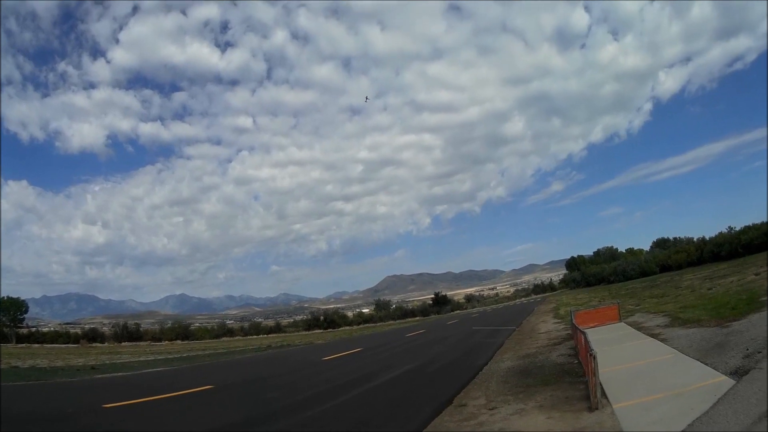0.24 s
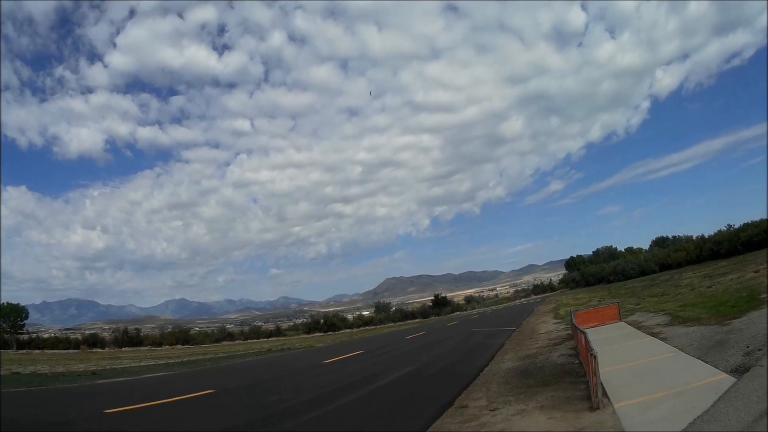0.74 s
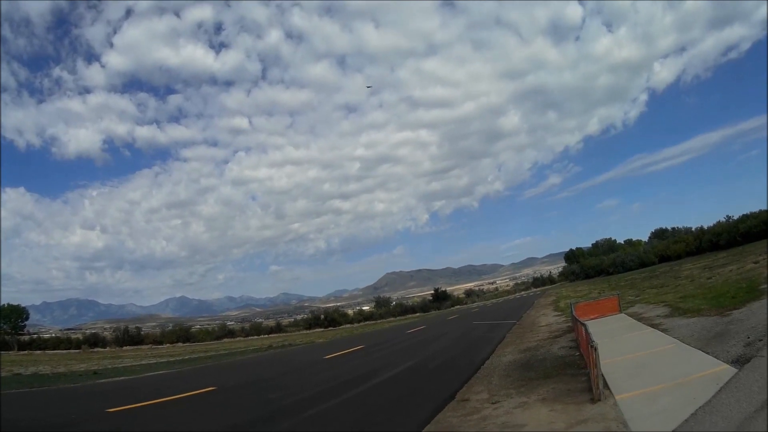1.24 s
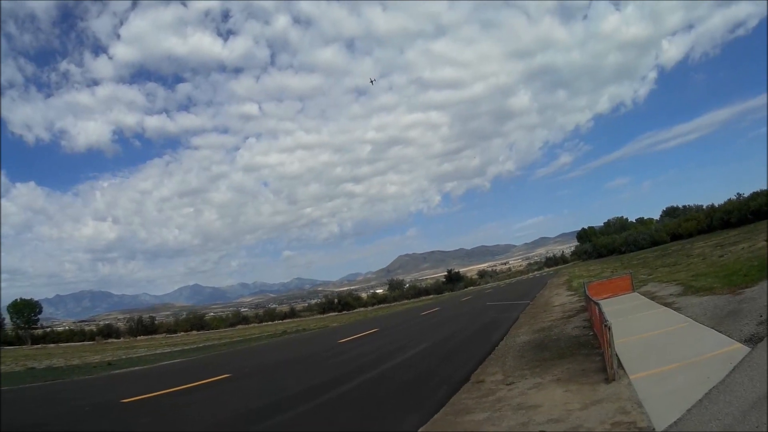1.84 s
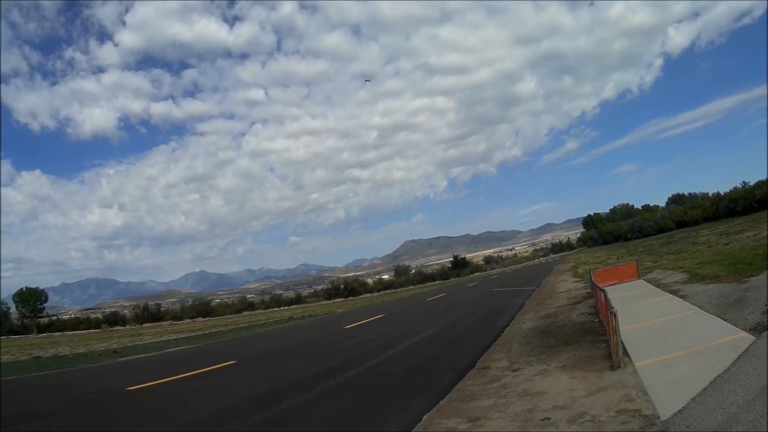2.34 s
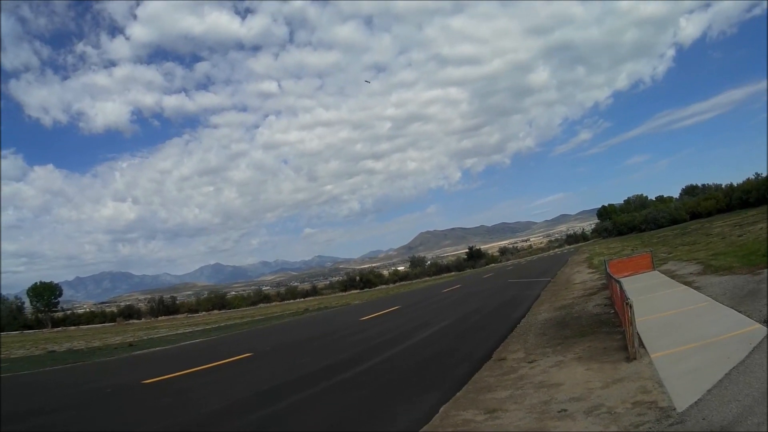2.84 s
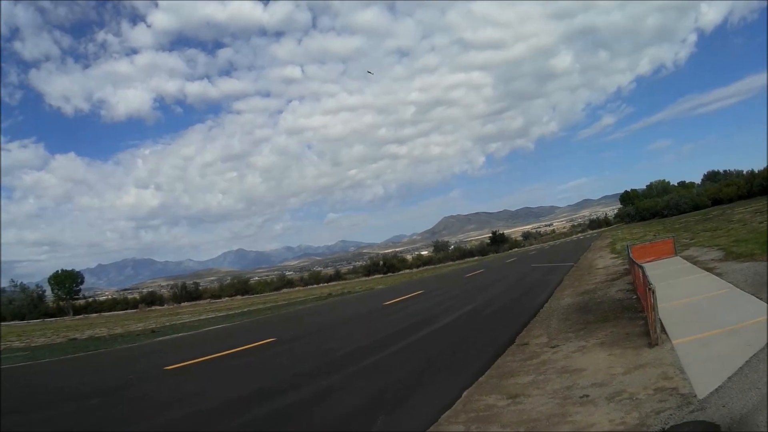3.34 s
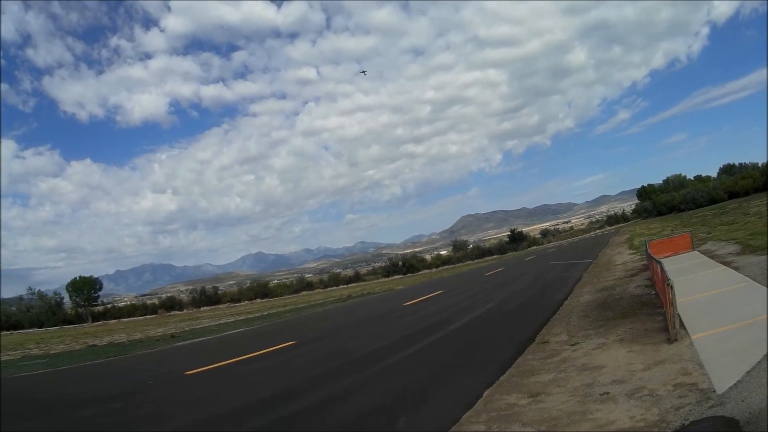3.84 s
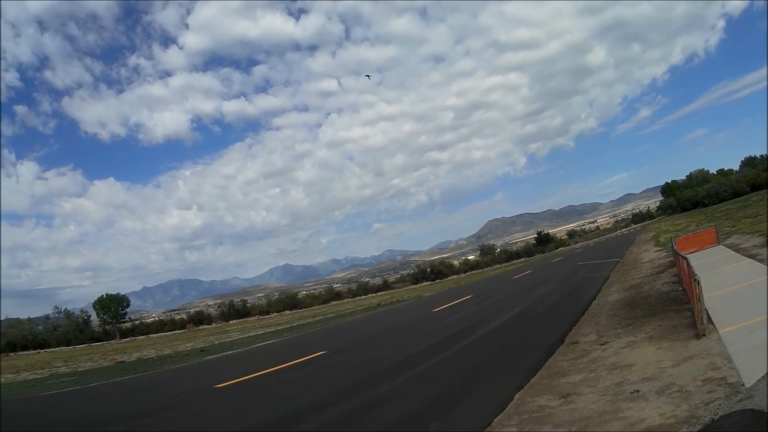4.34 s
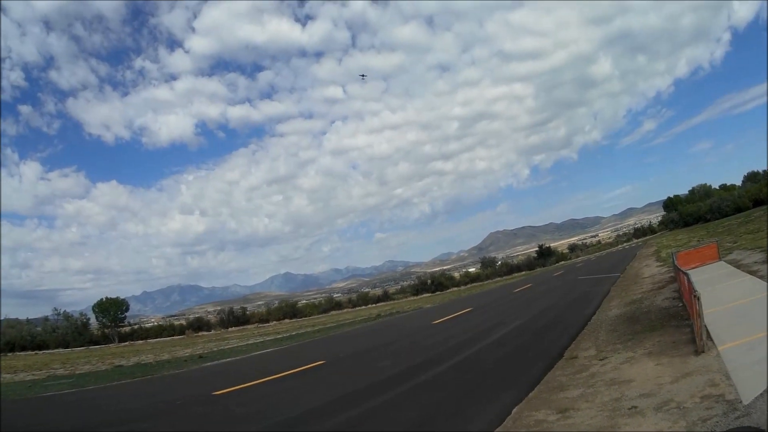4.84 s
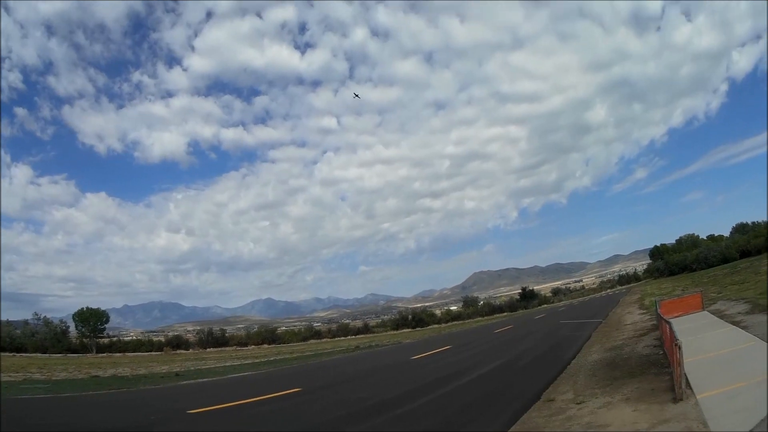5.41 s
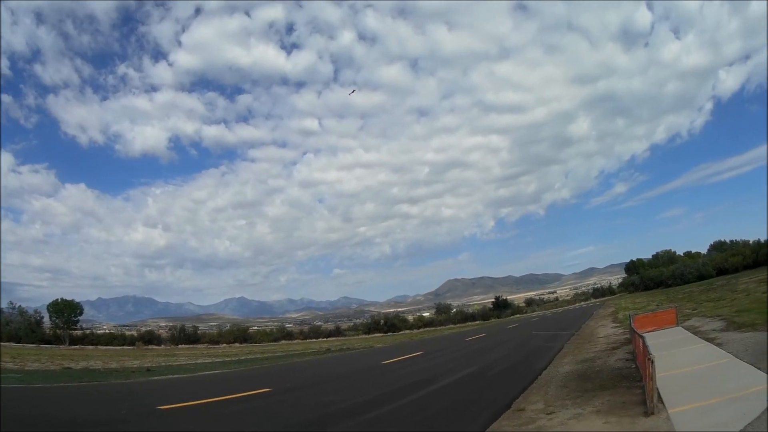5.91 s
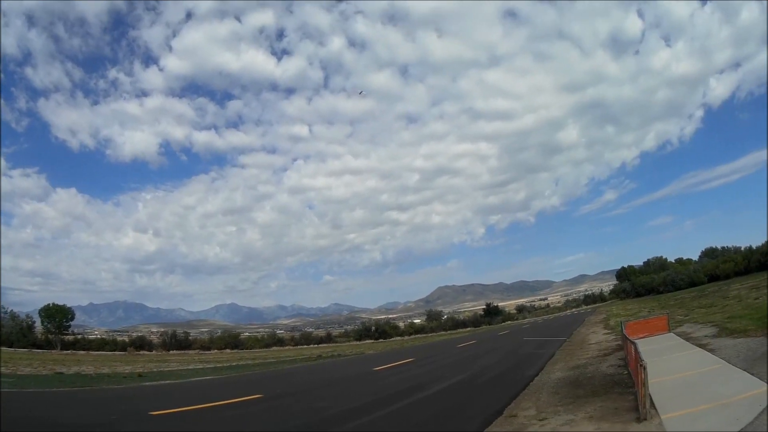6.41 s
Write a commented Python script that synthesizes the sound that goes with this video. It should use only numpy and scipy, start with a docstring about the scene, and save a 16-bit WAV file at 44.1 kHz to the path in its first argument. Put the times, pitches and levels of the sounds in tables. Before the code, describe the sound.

A petrol two-stroke on a large model aeroplane buzzes continuously over an open runway. It opens with a sharp rasp, thins into a hollow sliding honk, then crackles loudly in several swells. The pitch wavers slightly, sags after five seconds and quickly climbs back to a strong buzz. A small cased camera on the ground hears it with a close tarmac reflection, faint field scatter and soft hiss.

```python
"""A sharp rasping buzz comes first: the petrol two-stroke of a large model aeroplane, high over a runway.
Each turn of the crank fires one exhaust pop, and the propeller hums at twice that rate.
As the plane turns, the pops swing between a bright crack and a hollow, sliding honk.
At a small cased camera each pop arrives from the sky and again, some 4 ms later, off the tarmac.
The fields behind return a faint dull tail, over still air and hiss."""
import sys
import numpy as np
from scipy import signal
from scipy.fft import rfft, irfft, next_fast_len
from scipy.io import wavfile
from scipy.ndimage import uniform_filter1d, map_coordinates

SR = 44100
rng = np.random.default_rng(int(sys.argv[2]) if len(sys.argv) > 2 else 0)


def int16_out(signal):
    """Quantize to a 16-bit WAV file."""
    q = np.round(np.clip(np.atleast_2d(signal).T, -1, 1) * 32767)
    wavfile.write(sys.argv[1], SR, q.astype(np.int16))


N = 294147
TIME = np.arange(N) / SR   # s


# engine speed as heard on the ground: [t/s, firing rate f/Hz]
SPEED = [(0.0, 94.8), (0.05, 94.1), (0.5, 93.9), (0.6, 94.6), (0.8, 93.8), (1.0, 95.1), (1.05, 94.4),
         (1.1, 96.1), (1.2, 95.9), (1.25, 97.3), (1.76, 98.9), (2.16, 97.8), (2.36, 94.8), (2.51, 94.8),
         (2.76, 98.7), (3.06, 101.5), (3.16, 101.4), (3.21, 102.0), (3.26, 100.7), (3.31, 101.5),
         (3.46, 98.5), (3.56, 97.3), (3.91, 94.6), (4.36, 98.8), (4.46, 98.1), (4.51, 98.6), (4.71, 98.5),
         (4.81, 96.6), (4.96, 90.0), (5.02, 88.6), (5.22, 89.5), (5.32, 89.5), (5.37, 88.4), (5.57, 78.2),
         (5.62, 78.2), (5.72, 83.2), (5.77, 88.5), (5.92, 97.7), (6.02, 100.3), (6.12, 101.4),
         (6.22, 100.9), (6.37, 101.3), (6.57, 100.8), (6.67, 99.7)]
# spells of ragged or clean burning: [t/s, half-width/s, added roughness (0-1 scale)]
SPELLS = [(1.08, .2, .35), (5.9, .16, .25), (6.45, .22, -.2)]
INERTIA_S = 0.1   # the propeller's mass rounds off every change of speed
# burning is uneven (0-1), and more so as the throttle closes and the engine slows below its clean range
ROUGH_OPEN, CLEAN_ABOVE_HZ, ROUGH_PER_HZ = 0.5, 82, 0.028


def engine():
    """Crank turns so far, the running sum of the speed, and the roughness of the burning."""
    speed_hz = uniform_filter1d(in_time(SPEED)[0], int(INERTIA_S * SR), mode="nearest")
    rough = ROUGH_OPEN + ROUGH_PER_HZ * np.maximum(CLEAN_ABOVE_HZ - speed_hz, 0)
    for s, width_s, added in SPELLS:
        rough = rough + added * bell(s, width_s)
    turns = np.cumsum(speed_hz) / SR + 0.9   # the first pop comes a tenth of a turn in
    return turns, rough


# single hard firings of a rich charge: [t/s, pop level above the usual/dB]
BANGS = [(1.984, 5), (2.352, 4), (4.917, 6), (4.939, 5), (4.962, 5), (4.984, 4.5), (5.007, 3.5), (5.411, 6),
         (5.433, 5), (5.607, 6)]


def firings(turns, rough, jitter_s=0.00006, uneven_db=0.5, skip_db=0.5):
    """One impulse a turn, a little early or late, strong or weak, as the burning is rough."""
    count = np.arange(1, int(turns[-1]) + 1)
    when = np.interp(count, turns, TIME)
    unsteady = np.interp(when, TIME, rough)
    late, strong = rng.standard_normal((len(count), 2)).T
    at = np.clip((when + jitter_s * unsteady * late) * SR, 0, N - 2)
    # a badly scavenged cylinder fires strongly only every other turn
    every_other = (-1) ** count
    strength_db = unsteady * (uneven_db * strong + skip_db * unsteady * every_other)
    for s, extra_db in BANGS:
        strength_db[np.argmin(abs(when - s))] = extra_db
    strength = from_db(strength_db)
    # each impulse is shared between the two nearest samples
    sample, part = at.astype(int), at % 1
    pops = np.zeros(N)
    pops[sample] += strength * (1 - part)
    pops[sample + 1] += strength * part
    return pops


# one pop through silencer and camera case, shape only: [f/Hz, level/dB]
POP = [(300, -18), (390, -4.5), (480, 0.5), (700, 2.5), (900, 15), (1400, 17.5), (1850, 11.5), (2250, -8),
       (3100, -13.5), (4200, -21), (5200, -36.5), (6500, -46), (11000, -59)]
GAS_SHARE, GAS_DECAY_TURNS = 0.39, 0.11   # gas share is scaled by the roughness plus a half


def exhaust(turns, rough, gas_hz=2200):
    """Each pop is followed by a puff of turbulent gas, and both pass through the silencer."""
    pops = firings(turns, rough)
    puffs = rng.standard_normal(N) * np.exp(-(turns % 1) / GAS_DECAY_TURNS)
    puffs = signal.sosfilt(signal.butter(1, gas_hz, "high", fs=SR, output="sos"), puffs)
    gas = GAS_SHARE * (0.5 + rough) * rms_one(puffs)
    return colour(silencer(gas + rms_one(pops)), POP)


# the silencer's ringing modes: [f/Hz, width/Hz, lift level/dB]
RINGS = [(2638, 170, 10), (3620, 96, 8), (4660, 150, 7.5), (5640, 210, 20.5)]
RING_WANDER = 0.02   # the modes heard shift as the plane turns (spread, share of their pitch)


def silencer(x):
    """The higher modes ring on after each pop, at slowly wandering pitches."""
    for hz, width_hz, lift_db in RINGS:
        wandering_hz = hz * (1 + RING_WANDER * drift(3.06))
        x = x + (from_db(lift_db) - 1) * sliding(x, wandering_hz, width_hz)
    return x


# the camera case favours sound from below, bounce against direct: [f/Hz, level/dB]
BOUNCE = [(300, 7), (700, -1.5), (1100, 3), (1600, 6.5), (2800, 4.5), (4200, 2), (5600, -1.5), (9000, -1.5)]
# the lowest register, the drone: [t/s, level/dB]
DRONE = [(0.0, -38), (0.03, -30), (0.18, -29.5), (0.61, -39), (0.69, -34), (0.97, -47.5), (1.06, -37.5),
         (1.24, -39.5), (1.61, -35), (2.21, -35), (2.34, -29.5), (2.6, -29), (2.84, -34.5), (3.01, -46),
         (3.08, -37.5), (3.7, -30), (3.77, -34), (3.96, -35.5), (4.1, -42.5), (4.31, -34), (4.55, -36.5),
         (4.81, -30), (5.18, -39), (5.26, -37.5), (5.54, -42), (5.72, -37.5), (5.87, -25), (5.93, -27.5),
         (6.08, -26), (6.37, -35.5), (6.48, -32.5), (6.67, -38.5)]


def crack(pops, lobe_boost=1.0, rasp_boost=0.32, lobe_width_hz=230, rasp_width_hz=380):
    """The sharp, broad pops heard as the exhaust swings toward the ground, over its low drone."""
    gains, (lobe_hz, rasp_hz) = beam()
    lobe = sliding(pops, lobe_hz, lobe_width_hz)
    rasp = sliding(pops, rasp_hz, rasp_width_hz)
    pops = pops + lobe_boost * lobe + rasp_boost * rasp
    drone_gain = from_db(in_time(DRONE)[0])
    return beamed(with_bounce(pops, colour(pops, BOUNCE)), [drone_gain, *gains])


# the exhaust swings toward the ground and away: [t/s, half-width/s, level/dB, brightness/dB per octave,
# strongest pitch f/Hz, rasp pitch f/Hz, rasp lift level/dB]
SWINGS = [(0.03, 0.12, -28, -4.5, 1280, 3730, 11.5), (0.17, 0.13, -30.5, -11.5, 1260, 2720, 16.5),
          (0.35, 0.12, -40.5, 4, 1670, 3820, 8), (0.761, 0.23, -39.5, 2, 1560, 2480, 8),
          (1.499, 0.31, -38.5, 0, 723, 2620, 1.5), (2.08, 0.23, -32.5, 1.5, 1410, 4200, 1.5),
          (2.302, 0.054, -29, 2, 1890, 2600, 2), (2.41, 0.058, -26, -6, 1200, 4260, 5),
          (2.56, 0.082, -23.5, -1, 1280, 2730, 4), (2.68, 0.024, -37, 6, 1200, 3600, 4.5),
          (2.82, 0.1, -33, 1.5, 1130, 4620, -1), (3.081, 0.087, -32.5, 0.5, 1180, 3560, -11.5),
          (3.25, 0.079, -36, -2.5, 1370, 3470, 5.5), (3.42, 0.053, -40.5, 1.5, 1380, 4700, 9.5),
          (3.53, 0.063, -36, 0.5, 1930, 2780, 3), (3.73, 0.12, -24, -2.5, 1290, 3370, -5),
          (4.31, 0.04, -33.5, -5.5, 1390, 2700, -19), (4.66, 0.13, -37, 3, 1960, 2700, -2),
          (4.82, 0.072, -26.5, -6.5, 1280, 5160, 12), (5.0, 0.18, -34.5, -3, 1770, 2700, -6),
          (5.78, 0.067, -29, -2.5, 1990, 4100, 4.5), (5.91, 0.085, -26, -0.5, 960, 3280, 6.5),
          (6.13, 0.11, -21, -1, 700, 2860, -2.5), (6.22, 0.044, -31, 2, 880, 5440, 6.5),
          (6.42, 0.09, -30.5, -3.5, 1820, 3100, 9), (6.599, 0.2, -28.5, -2.5, 1950, 2280, 8)]
# registers above the drone, with the exhaust turned away: [level/dB]
AWAY_DB = [-44.5, -43, -63, -65.5, -66.5]
# the same registers facing the ground, relative to the swing: [level/dB]
FACING_DB = [-8, -8, -11, -15.5, -20]
LOBE_DB, LOBE_OCTAVES = 8.5, 0.42   # lift and half-width of the beam around its strongest pitch
RASP_OCTAVES = 0.45   # half-width of a swing's rasp


def beam(pivot_hz=1250):
    """The swings add in power: the gain of each register above the drone, and the two favoured pitches."""
    edges = np.array(REGISTER_EDGES_HZ[1:])
    centres = np.sqrt(edges[:-1] * edges[1:])
    power = from_db(AWAY_DB)[:, None] ** 2
    weight, pitches = 1e-30, pivot_hz * 1e-30
    for s, width_s, level_db, brightness_db, lobe_hz, rasp_hz, rasp_db in SWINGS:
        lobe_lift_db = LOBE_DB * np.exp(-(np.log2(centres / lobe_hz) / LOBE_OCTAVES) ** 2)
        rasp_lift_db = rasp_db * np.exp(-(np.log2(centres / rasp_hz) / RASP_OCTAVES) ** 2)
        tilt_db = brightness_db * np.log2(centres / pivot_hz)
        register_db = level_db + np.array(FACING_DB) + tilt_db + lobe_lift_db + rasp_lift_db
        facing = bell(s, width_s)
        power = power + np.outer(from_db(register_db) ** 2, facing)
        # the strongest swing of the moment sets the pitches
        share = facing * from_db(level_db) ** 2
        weight = weight + share
        pitches = pitches + np.outer([lobe_hz, rasp_hz], share)
    return np.sqrt(power), pitches / weight


# edges between the registers of the exhaust note, drone to sizzle: [f/Hz]
REGISTER_EDGES_HZ = [420, 750, 1250, 2100, 3100, 4400, 6300]
# spread of each register's flutter in the moving air: [level/dB]
FLUTTER_DB = [.5, .8, 1.0, 1.3, 1.3, 1.3]


def beamed(x, gains, flutter_rate=14):
    """Each register swells and fades as the plane turns, and flutters a little in the moving air."""
    tops = [above(x, hz) for hz in REGISTER_EDGES_HZ[:-1]] + [0]
    out = 0
    for k, gain in enumerate(gains):
        register = held(tops[k] - tops[k + 1])
        out = out + register * gain * from_db(FLUTTER_DB[k] * drift(flutter_rate))
    return out


# hollow resonance between the swings, sliding as the plane turns: [t/s, centre f/Hz, level before trim/dB]
HONK = [(0, 1420, -39), (.28, 1720, -26), (.48, 1360, -25), (.62, 1390, -27), (.75, 1400, -23),
        (.87, 1160, -19.5), (1.18, 970, -31.5), (1.35, 820, -25), (1.7, 795, -23), (1.9, 1150, -23.5),
        (2.1, 1390, -24), (2.2, 1700, -37), (2.31, 1870, -25), (2.42, 1700, -46), (3.05, 1250, -39),
        (3.22, 1420, -39.5), (3.45, 1500, -32), (3.7, 1450, -68), (4.2, 1360, -43), (4.32, 1290, -43),
        (4.65, 1850, -40.5), (4.9, 1900, -32), (5.5, 2240, -58), (5.66, 2010, -32), (5.8, 1700, -28),
        (5.95, 1490, -39), (6.25, 1610, -45), (6.37, 1640, -25.5), (6.49, 1470, -20.5), (6.6, 1440, -24),
        (6.67, 1510, -44)]
HONK_WIDTH_HZ = 620   # of each of the two resonances in series
HONK_LEAK = 0.14   # share of the pop that fills the skirts of the resonance
HONK_BOUNCE_DB = -1.5   # bounce off the tarmac, against direct


def honk(pops, trim_db=-2.0):
    """The hollow side of the exhaust: the pops ringing in one narrow sliding band."""
    centre_hz, level_db = in_time(HONK)
    once = sliding(pops, centre_hz, HONK_WIDTH_HZ)
    ringing = sliding(once + HONK_LEAK * pops, centre_hz, HONK_WIDTH_HZ)
    both_paths = with_bounce(ringing, from_db(HONK_BOUNCE_DB) * ringing)
    return from_db(level_db + trim_db) * held(both_paths)


# propeller tone heard side-on: [t/s, level/dB]
PROPELLER = [(0, -39.5), (1.0, -40), (1.9, -38.5), (2.45, -44), (2.9, -38), (4.4, -41), (5.7, -44.5),
             (6.15, -30.5), (6.67, -33.5)]
# the propeller is nearly silent along its axis, which sweeps past the listener:
# [t/s, half-width/s, depth level/dB]
AXIS_PASSES = [(.39, 0.27, -32), (2.1, 0.079, -21), (3.25, 0.14, -14), (3.59, 0.1, -19), (4.0, 0.3, -13.5),
               (4.43, 0.14, -15), (4.78, 0.074, -18), (5.44, 0.33, -9.5), (5.97, 0.13, -23),
               (6.361, 0.2, -17.5)]
# third engine order: [t/s, level/dB]
THIRD_ORDER = [(0.0, -35), (0.26, -35.5), (0.52, -43.5), (0.65, -38.5), (0.93, -43), (1.36, -34.5),
               (2.4, -42), (2.47, -38), (3.32, -38.5), (3.4, -45.5), (3.81, -33), (4.12, -39.5),
               (4.55, -33.5), (4.68, -44), (4.77, -37.5), (6.17, -39), (6.46, -52), (6.67, -48)]
# fourth engine order, the propeller's overtone: [t/s, level/dB]
FOURTH_ORDER = [(0.0, -47), (0.07, -55), (0.41, -50), (0.55, -56), (2.08, -43.5), (2.17, -47.5),
                (3.29, -59), (3.73, -44.5), (4.61, -61), (4.66, -51), (5.33, -65), (5.74, -43.5),
                (5.79, -54.5), (6.04, -34), (6.6, -35), (6.67, -41)]
CRANK_DB = -57   # peak of the steady crank tone
CRANK_WAVER = 0.49   # unsteadiness of the crank tone (spread, share of its level)


def hum(turns, rough, waver=0.33):
    """Low engine orders, sines locked to the crank: crank, two-blade propeller, third order, overtone."""
    propeller = from_db(in_time(PROPELLER)[0])
    for s, width_s, depth_db in AXIS_PASSES:
        lost_power = 1 - from_db(depth_db) ** 2
        propeller = propeller * np.sqrt(1 - lost_power * bell(s, width_s))
    third = from_db(in_time(THIRD_ORDER)[0])
    overtone = from_db(in_time(FOURTH_ORDER)[0])
    out = from_db(CRANK_DB) * np.sin(2 * np.pi * turns) * (1 + CRANK_WAVER * drift(25))
    for multiple, gain in enumerate((propeller, third, overtone), 2):
        tone = -np.sqrt(2) * np.sin(2 * np.pi * multiple * turns)
        out = out + gain * tone * (1 + waver * rough * drift(60))
    return out


# lag of the bounce off the tarmac, longer as the plane climbs: [t/s, lag/ms]
BOUNCE_LAG = [(0, 3.82), (.5, 3.93), (.75, 4.07), (1.15, 4.11), (1.45, 4.25), (1.9, 4.26), (2.17, 4.04),
              (2.38, 4.0), (2.8, 3.77), (3.25, 3.62), (3.8, 3.63), (4.4, 3.71), (4.65, 3.88), (5.25, 4.01),
              (5.7, 4.3), (5.95, 4.28), (6.2, 4.44), (6.67, 4.44)]


def with_bounce(x, mirrored):
    """The direct sound plus its mirror image in the tarmac, each through its own air."""
    late = np.arange(N) - in_time(BOUNCE_LAG)[0] * SR / 1000
    return through_air(x) + through_air(map_coordinates(mirrored, [late], order=3))


def through_air(x, share=0.91, eddy_hz=1900, spread_s=0.0016, rate=11, count=5):
    """Eddies bend the treble along slightly longer paths, so notches wander through the buzz."""
    treble = signal.sosfilt(signal.butter(2, eddy_hz, "high", fs=SR, output="sos"), x)
    lags = (np.arange(count) + rng.random(count)) / count * spread_s * SR
    detours = sum(drift(rate) * np.pad(treble, (int(lag), 0))[:N] for lag in lags)
    return x + share * detours


FIELD_T60_S, FIELD_DB = 1, -9   # decay to -60 dB; tail level before its treble is dulled


def fields(x, dull_hz=1900, build_s=0.0091):
    """Scrub, fences and trees scatter a thin dull tail: decaying noise convolved with the buzz."""
    age = TIME[:SR]
    tail = rng.standard_normal(SR) * from_db(-60 * age / FIELD_T60_S) * (1 - np.exp(-age / build_s))
    wet = signal.fftconvolve(x, tail / np.linalg.norm(tail))[:N]
    dull = signal.sosfilt(signal.butter(1, dull_hz, fs=SR, output="sos"), wet)
    return from_db(FIELD_DB) * dull


# still air and hiss, shape only: [f/Hz, level per Hz/dB]
AIR = [(20, -13.5), (60, -9), (130, -11.5), (350, -8.5), (1000, -3), (3000, -9.5), (7000, -35),
       (15000, -40.5)]


def still_air(level_db=-42.5):
    """Steady noise coloured like quiet open air and hiss, at a set overall level."""
    return from_db(level_db) * rms_one(colour(rng.standard_normal(N), AIR))


def from_db(db):
    """Decibels to gain."""
    return 10 ** (np.asarray(db) / 20)


def rms_one(x):
    """Scale to unit power."""
    return x / np.sqrt(np.mean(x ** 2) + 1e-20)


def in_time(rows):
    """Each column of a curve at every sample."""
    s, *columns = np.transpose(rows)
    return [np.interp(TIME, s, c) for c in columns]


def bell(s, width_s):
    """A smooth rise to 1 at time s and a like fall."""
    return np.exp(-((TIME - s) / width_s) ** 2)


def drift(rate):
    """Slow chance with spread 1, from rate random points a second joined smoothly."""
    coarse = TIME[::64]
    slow = map_coordinates(rng.standard_normal(size=2800), [coarse * rate], order=3, mode="wrap")
    return np.interp(TIME, coarse, rms_one(slow))


def colour(x, points):
    """Causal (minimum-phase) filter with the given spectrum."""
    size = next_fast_len(N + SR // 4, True) // 2 * 2
    hz, db = np.transpose(points)
    grid = np.maximum(np.fft.rfftfreq(size, 1 / SR), 1)
    gain = from_db(np.interp(np.log(grid), np.log(hz), db))
    # folding the cepstrum onto positive times makes the filter causal
    cepstrum = irfft(np.log(gain))
    cepstrum[1:size // 2] *= 2
    cepstrum[size // 2 + 1:] = 0
    return irfft(rfft(x, size) * np.exp(rfft(cepstrum)))[:N]


def sliding(x, centre_hz, width_hz):
    """A resonance whose centre slides: shift it down to 0 Hz, smooth, shift back."""
    spin = np.exp(2j * np.pi * np.cumsum(centre_hz) / SR)
    r = np.exp(-np.pi * width_hz / SR)
    return 2 * np.real(spin * signal.lfilter([1 - r], [1, -r], x / spin))


def above(x, hz):
    """The part of x above hz, in step with x."""
    return signal.sosfiltfilt(signal.butter(6, hz, "high", fs=SR, output="sos"), x)


def held(x, size=3600):
    """x with its slow level evened to 1, over windows of size samples."""
    power = uniform_filter1d(uniform_filter1d(x ** 2, size), size // 2)
    return x / np.sqrt(power + 1e-14)


def scene():
    """The plane overhead, its scatter off the fields and the quiet air."""
    turns, rough = engine()
    pops = exhaust(turns, rough)
    buzz = crack(pops) + honk(pops)
    return (buzz + hum(turns, rough) + fields(buzz) + still_air())[None]


def record(dry, cutoff_hz=15500):
    """A steep low-pass cuts the top of the spectrum."""
    return signal.sosfilt(signal.ellip(10, 0.1, 90, cutoff_hz, fs=SR, output="sos"), dry)


dry = scene()
out = record(dry)
int16_out(out)
```